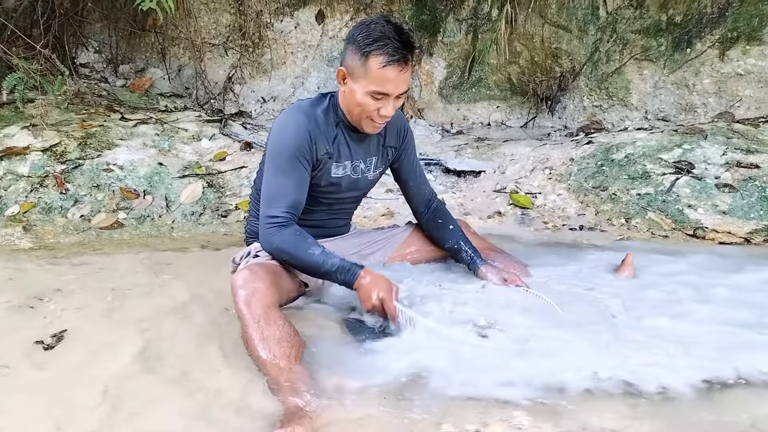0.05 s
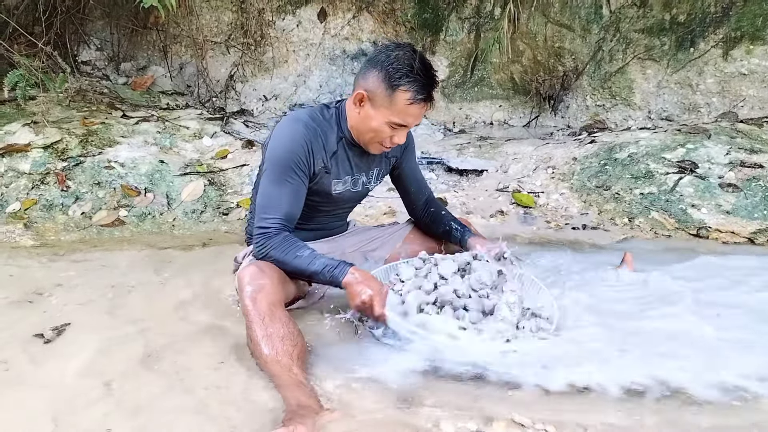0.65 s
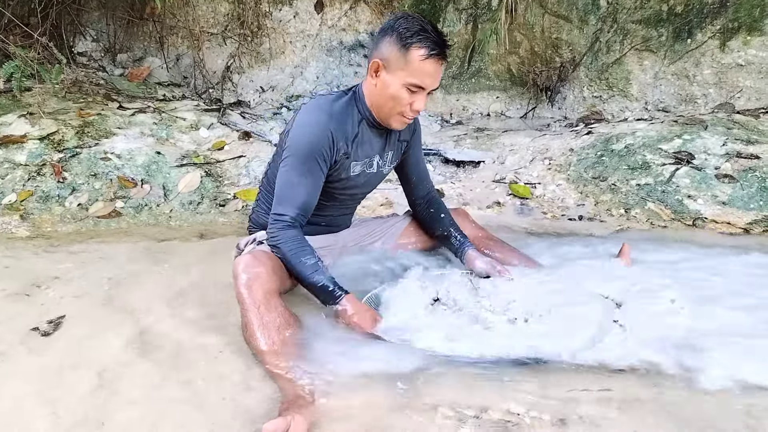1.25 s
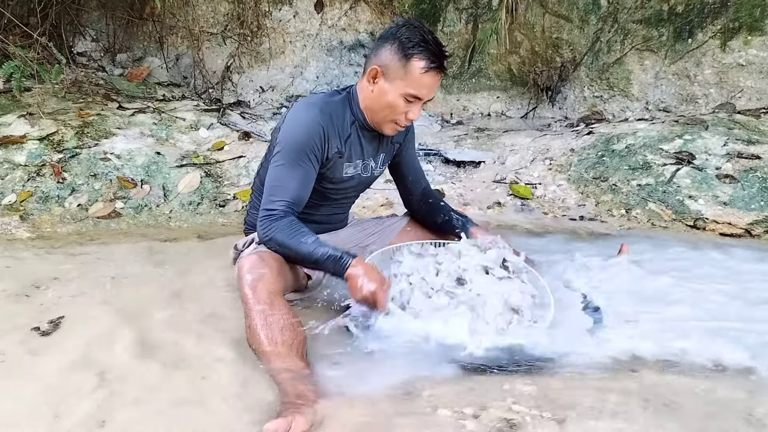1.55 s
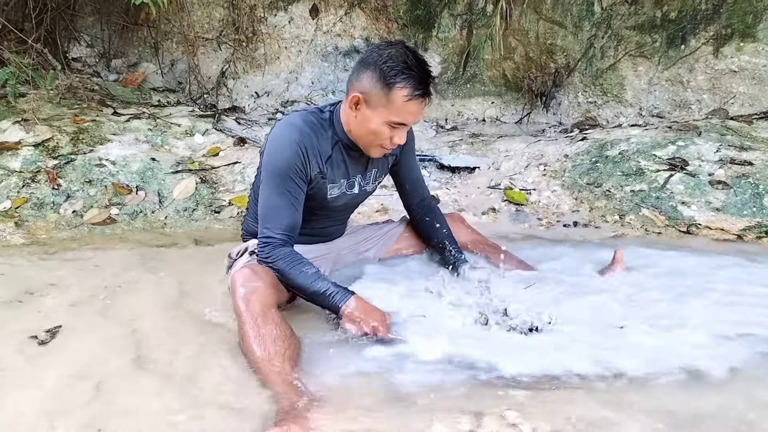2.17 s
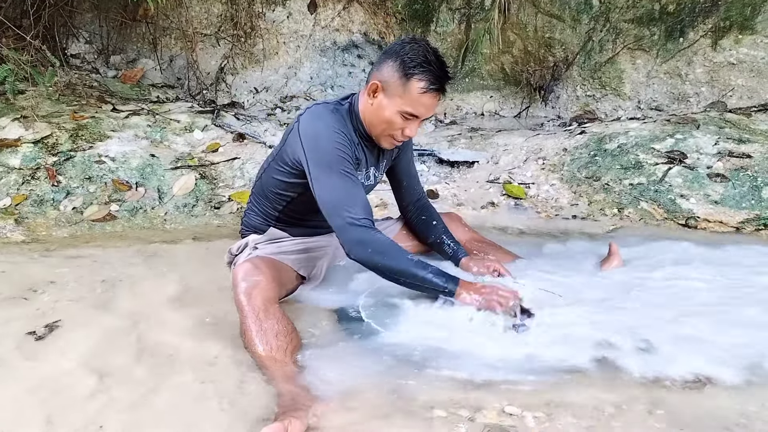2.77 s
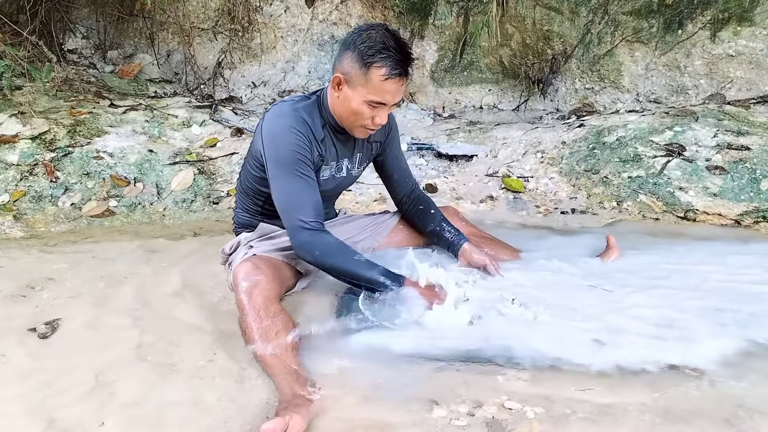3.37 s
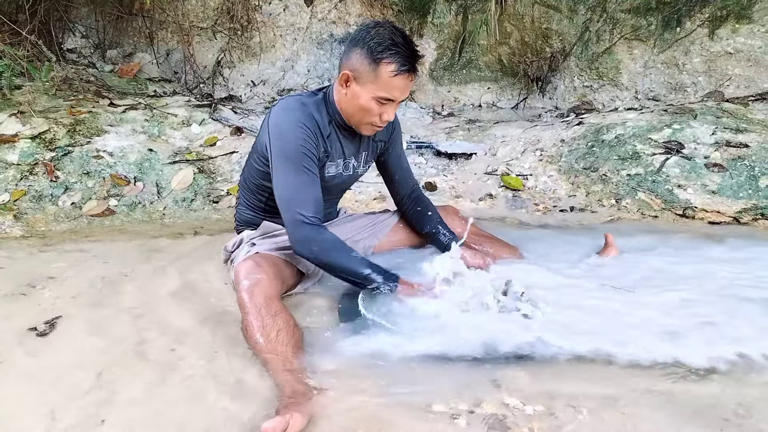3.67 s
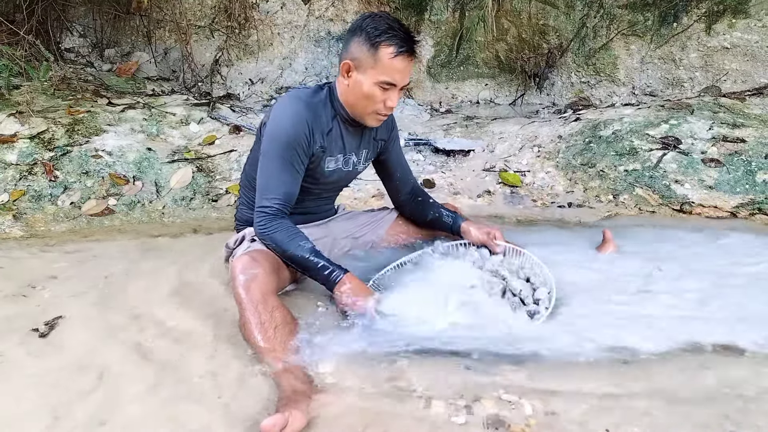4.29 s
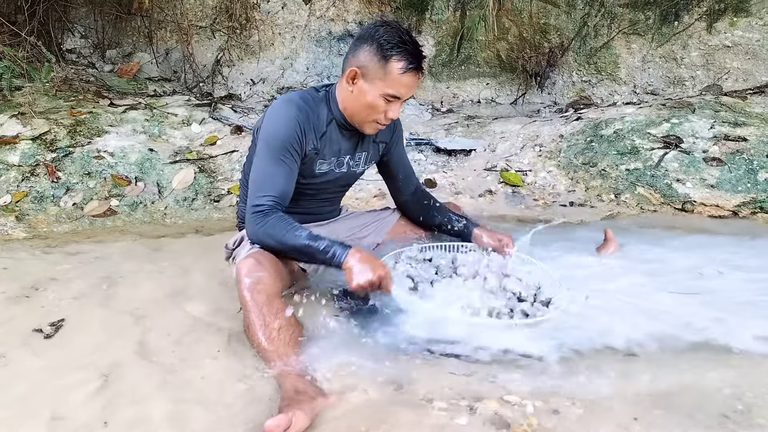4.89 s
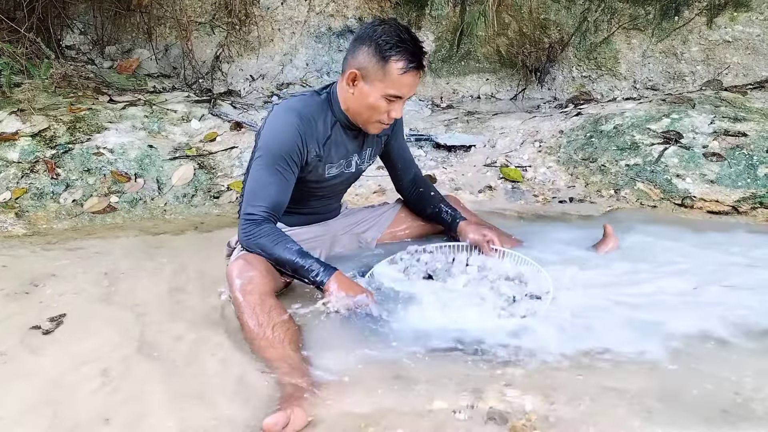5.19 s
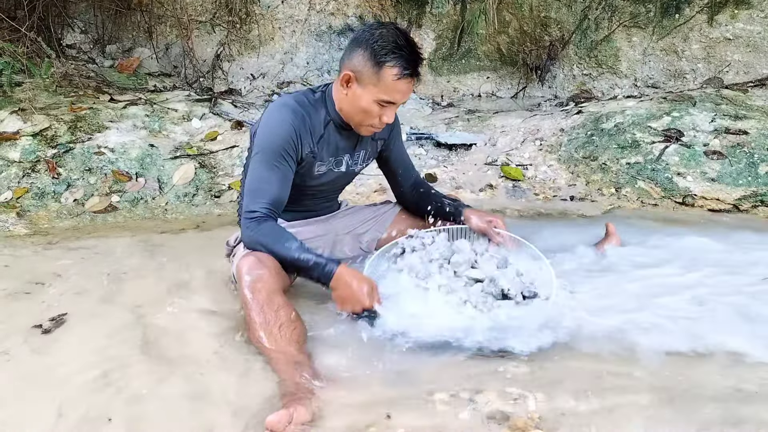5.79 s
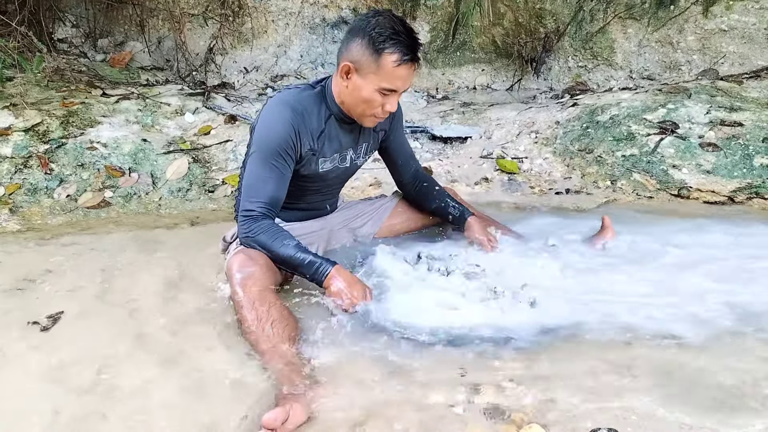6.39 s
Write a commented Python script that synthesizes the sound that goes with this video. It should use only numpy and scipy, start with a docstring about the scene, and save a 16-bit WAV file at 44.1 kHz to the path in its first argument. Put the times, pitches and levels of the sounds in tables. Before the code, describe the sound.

A basket of gravel in a pan is washed in a shallow forest stream, heard close with a very short echo. From about 0.2 to 1 second, quick shakes, roughly ten a second, slosh water through the gravel and throw fizzing spray, with hissing sand, stone clicks and bubble plops. After a brief dip, a second bout runs from 1.5 to 2.1 seconds. From 2.2 to 4.4 seconds the basket is under water and a hand stirs it: softer swishes, small splashes, drips and low gulps. The pan bumps dully on the bed near 4.2 seconds. Shaking resumes from 4.5 to 5.2 seconds, eases, then returns strongest from 5.7 to 6.4 seconds with bright spray and crunching stones. Throughout, the quiet stream and a thin, high band of insects lie faintly underneath.

```python
"""A basket of gravel in a pan is dunked, rocked and stirred by hand in a shallow forest stream.
Each shake sloshes water through the gravel and throws spray; trapped air rings as bubbles and gulps.
Sand hisses, stones click and the pan bumps the bed, all with a short echo from the bank.
Between shakes one hears drips, the quiet stream and a thin band of insects."""
import sys
import numpy as np
from scipy import signal
from scipy.fft import rfft, irfft, next_fast_len
from scipy.io import wavfile
from scipy.ndimage import uniform_filter1d

SR = 44100
rng = np.random.default_rng(int(sys.argv[2]) if len(sys.argv) > 2 else 0)


def transcribe(signal):
    """Save signal, clipped to [-1, 1], as a 16-bit WAV file at the path in sys.argv[1]."""
    frames = np.atleast_2d(signal).T
    limited = np.clip(frames, -1, 1)
    pcm = np.round(limited * 32767).astype(np.int16)
    wavfile.write(sys.argv[1], SR, pcm)


N = 293265
TIME_S = np.arange(N) / SR
SUNK_FROM_S, SUNK_TO_S = 2.25, 4.45
FOAM_SHARE = .3  # of churning power

# Source spectra. Each row: frequency in Hz, relative level in dB.
STREAM_SPECTRUM = [(25, -23), (60, -15), (130, -5), (250, -1.5), (450, -5.5), (800, -18), (1300, -17),
                   (2000, 1.5), (2700, 2), (4000, -8.5), (5000, -7.5), (7500, -9), (9500, -32),
                   (12000, -17.5), (15500, -21)]
INSECT_SPECTRUM = [(4500, -20), (6000, -1), (6700, 7), (7200, 14.5), (7600, -1), (8300, -6.5), (9500, -72)]
THUD_SPECTRUM = [(35, -41), (105, -2), (260, 1), (600, -9.5), (2000, -48.5), (6000, -70)]
GRAVEL_SPECTRUM = [(1500, -27), (4000, 5.5), (7200, 11), (9500, -10), (11700, -1), (15500, -5.5)]
GURGLE_SPECTRUM = [(30, -66), (90, -30), (160, -14.5), (260, 2.5), (380, 5.5), (500, 4.5), (800, -49)]
SPRAY_SPECTRUM = [(900, -50), (1900, -13), (2600, 6.5), (3900, -7), (4700, -9.5), (6200, -4.5), (7300, -16),
                  (8300, -22.5), (9500, -48), (15500, -16)]
SLOSH_SPECTRUM = [(150, -31), (380, -21.5), (520, 4), (720, -4.5), (1250, -7.5), (1800, -5), (2400, -6),
                  (5000, -36)]
# Resonances common to these spectra. Each row: centre in Hz, width in Hz, boost in dB.
SHARED_RESONANCES = [(784.5, 143, 13.5), (1247, 207, 16.5), (1736, 163, 9), (2492, 200, 5.5),
                     (4000, 840, 10), (11800, 220, 4)]
# Echo off bank and trees. Each row: frequency in Hz, T60 in seconds.
BANK_DECAY = [(200, 0.04), (1000, 0.06), (4000, 0.067), (12000, 0.032)]
# Impacts. Each row: time in seconds, relative level in dB.
PAN_BUMPS = [(0.403, -46), (0.888, -42), (4.206, -34), (4.232, -28), (5.32, -37), (5.467, -51),
             (5.884, -42)]
STONE_CLICKS = [(0.027, -53), (0.102, -53), (0.254, -33), (0.667, -40), (1.732, -31), (1.92, -29),
                (2.098, -40), (3.493, -35), (3.846, -45.5), (4.294, -48), (5.657, -41.5), (6.046, -35),
                (6.207, -33), (6.396, -32)]
# Rocking at the surface; hand sweeps through the sunken basket.
# Each row: start in seconds, slosh level in dB, spray level in dB, hold in seconds.
ROCKING_BOUTS = [(0.235, -32.5, -34, 0.8), (1.5, -32.5, -35, 0.58), (4.52, -35, -35, 0.66),
                 (5.68, -30, -32.5, 0.71)]
HAND_SWEEPS = [(2.21, -41, -45, 0.073), (2.51, -52, -42.5, 0.052), (2.89, -47, -41.5, 0.34),
               (3.26, -33.5, -38.5, 0.14), (3.5, -34, -39, 0.069), (3.68, -48, -40.5, 0.18),
               (3.8, -35, -40, 0.068), (4.05, -36, -40.5, 0.052), (4.14, -35, -38.5, 0.12)]
# Basket jerks, about ten a second in a bout; hand or rim breaking the surface.
# Each row: peak time in seconds, slap level in dB, spray level in dB, time scale in seconds.
BASKET_SHAKES = [(0.277, -29, -29, 0.022), (0.341, -29, -28, 0.014), (0.48, -32, -30, 0.025),
                 (0.549, -30, -28.5, 0.017), (0.67, -26, -23, 0.027), (0.758, -32, -31, 0.021),
                 (0.887, -33, -28.5, .014), (1.004, -61, -28, 0.016), (1.535, -33, -23, 0.011),
                 (1.616, -21.5, -27, 0.0074), (1.729, -32, -31.5, 0.038), (1.822, -28.5, -25, 0.019),
                 (1.921, -34, -20, 0.017), (1.995, -26, -28.5, 0.02), (2.103, -30, -27, 0.025),
                 (4.542, -27, -27, 0.032), (4.638, -28.5, -23.5, 0.005), (4.792, -39, -26.5, 0.019),
                 (4.91, -29, -32, .015), (5.006, -26, -28, 0.02), (5.08, -20.5, -40, 0.0045),
                 (5.128, -30, -32, 0.033), (5.2, -22.5, -28.5, 0.0071), (5.233, -28.5, -30.5, 0.022),
                 (5.667, -41.5, -27.5, 0.021), (5.704, -38, -21, 0.0056), (5.758, -25.5, -28, 0.008),
                 (5.881, -25, -23, 0.016), (5.96, -26, -23, .012), (6.046, -34, -19.5, 0.017),
                 (6.124, -25.5, -20, 0.014), (6.204, -25, -18, 0.016), (6.297, -28.5, -26.5, 0.017),
                 (6.393, -27, -22, 0.014)]
SURFACE_SPLASHES = [(0.023, -44, -37.5, 0.0066), (0.081, -35.5, -43, 0.0038), (0.221, -36, -30, 0.01),
                    (1.413, -37, -32.5, 0.02), (1.484, -33, -51, 0.0094), (2.648, -40.5, -35.5, 0.0067),
                    (2.709, -51, -36.5, 0.0045), (2.872, -44.5, -33, 0.0066), (2.924, -34, -31.5, 0.012),
                    (3.033, -33.5, -29.5, 0.0062), (3.11, -35.5, -41, 0.0045), (3.25, -35, -29.5, .007),
                    (3.492, -31.5, -23.5, 0.0065), (3.777, -34.5, -26, 0.013), (4.034, -38, -33.5, .012),
                    (4.152, -33.5, -54, 0.044), (4.236, -33, -35.5, 0.013), (4.306, -58, -36, 0.014),
                    (4.465, -33.5, -52, .007), (5.323, -33.5, -49, .003), (5.591, -34.5, -40.5, .009),
                    (6.365, -24, -27.5, 0.011)]
# Large air pockets folding under; single bubbles and drops.
# Each row: peak time in seconds, pitch in Hz, peak level in dB.
AIR_GULPS = [(0.299, 416, -37), (0.895, 257, -33.5), (0.955, 218, -47), (1.486, 253, -36.5),
             (1.615, 330, -36.5), (1.968, 347, -35), (2.07, 246, -45), (2.512, 348, -35.5),
             (3.41, 275, -35.5), (3.601, 302, -44.5), (3.698, 274, -43.5), (3.939, 298, -37),
             (4.142, 273, -32), (4.213, 253, -34.5), (4.648, 339, -36), (5.729, 335, -30.5),
             (5.989, 345, -37.5), (6.087, 250, -32.5), (6.166, 353, -32.5), (6.439, 310, -31)]
BUBBLE_PLOPS = [(0.138, 1214, -28), (0.249, 1104, -15.5), (0.888, 704, -22), (1.159, 730, -28),
                (1.236, 1190, -30.5), (1.292, 1330, -26), (1.451, 1195, -25), (1.408, 3920, -25.5),
                (1.486, 1780, -20), (1.829, 1730, -16), (2.146, 564, -23), (2.209, 630, -29.5),
                (2.252, 2410, -27), (2.897, 1220, -22), (2.933, 6040, -29), (2.944, 740, -21.5),
                (2.967, 2470, -22.5), (3.017, 2670, -14.5), (3.364, 2580, -22), (3.507, 754, -20),
                (3.774, 3890, -15), (3.795, 2520, -24), (3.943, 890, -20.5), (4.036, 2574, -20),
                (4.055, 2800, -23.5), (4.064, 2550, -24), (4.08, 663, -22), (4.139, 542, -22.5),
                (4.407, 1190, -29.5), (4.551, 3660, -20), (4.637, 720, -22), (4.783, 1180, -18),
                (5.081, 807, -18), (5.731, 536, -21.5), (6.059, 750, -12.5), (6.204, 3840, -14.5)]


def gain_of(db):
    """Decibels to amplitude."""
    return 10 ** (np.asarray(db) / 20)


def rms(x):
    """Root mean square, never zero."""
    return np.sqrt(np.mean(x ** 2) + 1e-20)


def unit_rms(x):
    """Scales to rms 1."""
    return x / rms(x)


def curve_at(points, hz):
    """Interpolates over log frequency."""
    points_hz, values = np.transpose(points)
    return np.interp(np.log(hz + 1), np.log(points_hz + 1), values)


def add(mix, start_s, sound):
    """Mixes a sound in, clipped to the mix's span."""
    start = round(start_s * SR)
    part = mix[max(start, 0):max(start + len(sound), 0)]
    part += sound[max(-start, 0):][:len(part)]


def colour(x, spectrum, size=4096):
    """Minimum-phase filter: spectrum plus shared resonances. Keeps white-noise power."""
    hz = np.fft.rfftfreq(size, 1 / SR)
    boost = 1 + sum((gain_of(db) ** 2 - 1) * np.exp(-2 * ((hz - centre_hz) / width_hz) ** 2)
                    for centre_hz, width_hz, db in SHARED_RESONANCES)
    log_gain = np.log(gain_of(curve_at(spectrum, hz))) + .5 * np.log(boost)
    mirrored = np.r_[log_gain, log_gain[-2:0:-1]]
    response = np.exp(np.conj(signal.hilbert(mirrored)))
    taps = np.fft.ifft(response).real[:size // 2]
    return signal.oaconvolve(x, taps / np.linalg.norm(taps))[:N]


def wander(rate_hz):
    """Smooth random drift, rms 1."""
    size = next_fast_len(N)
    hz = np.fft.rfftfreq(size, 1 / SR)
    lowpass = np.exp(-.5 * (hz / rate_hz) ** 2)
    return unit_rms(irfft(rfft(rng.standard_normal(N), size) * lowpass, size)[:N])


def stream(level_db=-54):
    """Distant running water: steady noise."""
    return gain_of(level_db) * colour(rng.standard_normal(N), STREAM_SPECTRUM)


def insects(level_db=-54, throb_db=.9):
    """Chorus in the trees: a shrill, slightly throbbing noise band."""
    shrill = colour(rng.standard_normal(N), INSECT_SPECTRUM)
    return shrill * gain_of(level_db + throb_db * wander(rate_hz=67))


def bank_echo(x, delay_s=.006):
    """Scattered reflections, each band with its own decay."""
    taps = rng.choice([-1., 1.], SR // 2) * (rng.random(SR // 2) < 1 / 20)
    taps[:int(delay_s * SR)] = 0
    hz, t, bands = signal.stft(taps, SR, nperseg=256)
    decay = gain_of(-60 * t / curve_at(BANK_DECAY, hz)[:, None])
    _, tail = signal.istft(bands * decay, SR, nperseg=256)
    return signal.oaconvolve(x, tail / np.linalg.norm(tail))[:N]


def sunk():
    """1 with the basket under water, else 0; 0.1 s ramps."""
    return uniform_filter1d(1. * ((TIME_S > SUNK_FROM_S) & (TIME_S < SUNK_TO_S)), SR // 10)


def splash_power(layer):
    """Power of "slap" or "spray": each shake or splash breaks fast, then drains."""
    power = np.zeros(N)
    t = np.arange(-SR // 20, SR // 10) / SR
    for peak_s, slap_db, spray_db, scale_s in BASKET_SHAKES + SURFACE_SPLASHES:
        db = slap_db if layer == "slap" else spray_db
        break_s, drain_s = .44 * scale_s, .59 * scale_s
        shape = np.exp(-np.where(t < 0, (t / break_s) ** 2, t / drain_s))
        add(power, peak_s + t[0], gain_of(db) ** 2 * shape)
    return power


def churn_db(layer, lapping_db=-52.5):
    """Level of "slosh" or "spray": bouts and sweeps rise, hold and settle over constant lapping."""
    steps_s = TIME_S[::SR // 1000]
    power = gain_of(lapping_db) ** 2
    for rows, rise_db_per_s, settle_db_per_s in (ROCKING_BOUTS, 218, 78), (HAND_SWEEPS, 320, 130):
        for start_s, slosh_db, spray_db, hold_s in rows:
            db = slosh_db if layer == "slosh" else spray_db
            t = steps_s - start_s
            shape_db = rise_db_per_s * np.minimum(t, 0) - settle_db_per_s * np.maximum(t - hold_s, 0)
            power = power + gain_of(db + shape_db) ** 2
    return np.interp(TIME_S, steps_s, 10 * np.log10(power))


def bumps(decay_s=.0031, shudder_db=-12):
    """Pan on the sandy bed: a dull push and a short low shudder."""
    out = np.zeros(N)
    age = np.arange(SR // 10) / (decay_s * SR)
    for start_s, db in PAN_BUMPS:
        shudder = gain_of(shudder_db) * np.exp(-age / 4) * rng.standard_normal(len(age))
        push = np.exp(-age) * rng.standard_normal(len(age))
        add(out, start_s, gain_of(db) * (push + shudder))
    return colour(out, THUD_SPECTRUM)


def gravel(click_db=8, swell_s=.002, sand_db=-9, grit_db=2, ticks_db=-2, ticks_per_s=180, sunk_db=-7):
    """Sand hisses and ticks with the shaking, less under water; stones knock in bright crunches."""
    shaking = np.sqrt(gain_of(churn_db("spray")) ** 2 + .5 * splash_power("spray"))
    impulses = rng.standard_normal(N) * (rng.random(N) < ticks_per_s / SR)
    grain = rng.standard_normal(64) * np.hanning(64)
    ticks = gain_of(ticks_db) * unit_rms(signal.oaconvolve(impulses, grain)[:N])
    hiss = rng.standard_normal(N) * gain_of(grit_db * wander(rate_hz=83))
    out = gain_of(sand_db + sunk_db * sunk()) * shaking ** 1.198 * (hiss + ticks)
    age = np.arange(SR // 20) / (swell_s * SR)
    for peak_s, db in STONE_CLICKS:
        crunch = age * np.exp(1 - age) * rng.standard_normal(len(age))
        add(out, peak_s - swell_s, gain_of(db + click_db) * crunch)
    return colour(out, GRAVEL_SPECTRUM)


def bubble(hz, swell_s, rise):
    """Trapped air rings, swells and dies. Pitch climbs near the surface, most for large bubbles."""
    age = np.arange(int(6 * swell_s * SR) + 2) / (swell_s * SR)
    climb = rise / (1 + hz / 1000)
    turns = np.cumsum(hz * (1 + climb * np.tanh((age - 1) / 2))) / SR
    return age ** 2 * np.exp(2 - 2 * age) * np.sin(2 * np.pi * turns)


def froth(level, spectrum, low_hz, high_hz, base_per_s, swell_cycles, spread_db):
    """Bubble swarm at the rms of level. Harder churning makes more and louder bubbles."""
    pace = unit_rms(level)
    peaks = np.flatnonzero(rng.random(N) < base_per_s * np.sqrt(pace) / SR)
    pitch, strength, polarity, length = rng.random((N, 4))[peaks].T
    hz = low_hz * (high_hz / low_hz) ** pitch
    swell_s = swell_cycles * (.5 + length) / hz
    height = np.sign(polarity - .5) * pace[peaks] ** .8 * hz * gain_of(spread_db * strength ** 2)
    out = np.zeros(N)
    for k, peak in enumerate(peaks):
        add(out, peak / SR - swell_s[k], height[k] * bubble(hz[k], swell_s[k], rise=.12))
    return rms(level) * unit_rms(colour(out, spectrum))


def gurgle(under_slosh_db=-26, gulp_db=-12, gulp_s=.025, pockets_db=-1, noise_db=-3):
    """Large air pockets fold under as the pan dips: weak under any slosh, jumping at each gulp."""
    power = gain_of(churn_db("slosh") + under_slosh_db) ** 2
    t = np.arange(-SR // 2, SR // 2) / SR
    shape = np.exp(-np.where(t < 0, (t / gulp_s) ** 2, t / gulp_s))
    for peak_s, _, db in AIR_GULPS:
        add(power, peak_s + t[0], gain_of(db + gulp_db) ** 2 * shape)
    level = np.sqrt(power)
    pockets = froth(level, GURGLE_SPECTRUM, low_hz=190, high_hz=480,
                    base_per_s=70, swell_cycles=2.2, spread_db=8)
    noise = level * colour(rng.standard_normal(N), GURGLE_SPECTRUM)
    return gain_of(pockets_db) * pockets + gain_of(noise_db) * noise


def plops(min_swell_s=.002777, slow_below_hz=480, push_db=-12):
    """Single bubbles ring out, each with the soft, lower push of water closing over it."""
    out = np.zeros(N)
    for peak_s, hz, db in AIR_GULPS + BUBBLE_PLOPS:
        swell_s = min_swell_s * (1 + (slow_below_hz / hz) ** 2)
        add(out, peak_s - swell_s, gain_of(db) * bubble(hz, swell_s, rise=.11))
        push_s = .7 / hz
        push = bubble(.8 * hz, push_s, rise=0)
        add(out, peak_s - swell_s / 2 - push_s, gain_of(db + push_db) * push)
    return out


def spray(surge_db, bubbles_db=-2.5):
    """Water rains back through the lifted basket: tiny bubbles in a soft fizz."""
    churn = gain_of(churn_db("spray") + surge_db) ** 2
    bursts = splash_power("spray")
    rain = churn * (1 - .65 * sunk())  # little falls while sunk
    bubbles = froth(np.sqrt(rain + .3 * bursts), SPRAY_SPECTRUM, low_hz=2000, high_hz=7000,
                    base_per_s=560, swell_cycles=5.2, spread_db=14)
    fizz = rng.standard_normal(N) * np.sqrt(FOAM_SHARE * churn + bursts)
    return gain_of(bubbles_db) * bubbles + colour(fizz, SPRAY_SPECTRUM)


def slosh(surge_db, bubbles_db=-2.5, slap_db=1):
    """Water rolls through the gravel: mid-sized bubbles over foam and slaps."""
    churn = gain_of(churn_db("slosh") + surge_db) ** 2
    slaps = splash_power("slap")
    bubbles = froth(np.sqrt(churn + .33 * slaps), SLOSH_SPECTRUM, low_hz=400, high_hz=2200,
                    base_per_s=300, swell_cycles=3.9, spread_db=12)
    foam = rng.standard_normal(N) * np.sqrt(FOAM_SHARE * churn + gain_of(slap_db) ** 2 * slaps)
    return gain_of(bubbles_db) * bubbles + colour(foam, SLOSH_SPECTRUM)


def scene(echo_db=-15):
    """Mono mix: panning and its echo over stream and insects. Slosh and spray share one surge."""
    surge_db = 2 * wander(rate_hz=45)
    panning = slosh(surge_db) + gurgle() + spray(surge_db) + plops() + gravel() + bumps()
    return (panning + gain_of(echo_db) * bank_echo(panning) + stream() + insects())[None]


def record(dry):
    """Low-pass at 15.8 kHz."""
    lowpass = signal.firwin(511, 15800, window=("kaiser", 9), fs=SR)
    return signal.oaconvolve(dry, lowpass[None], "same")


dry = scene()
out = record(dry)
transcribe(out)
```